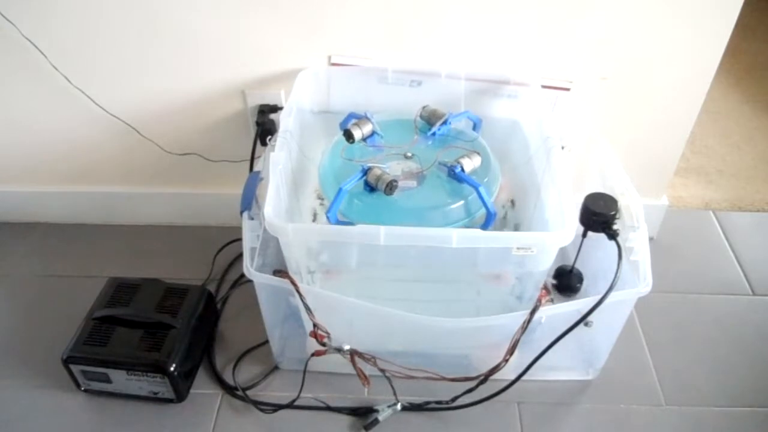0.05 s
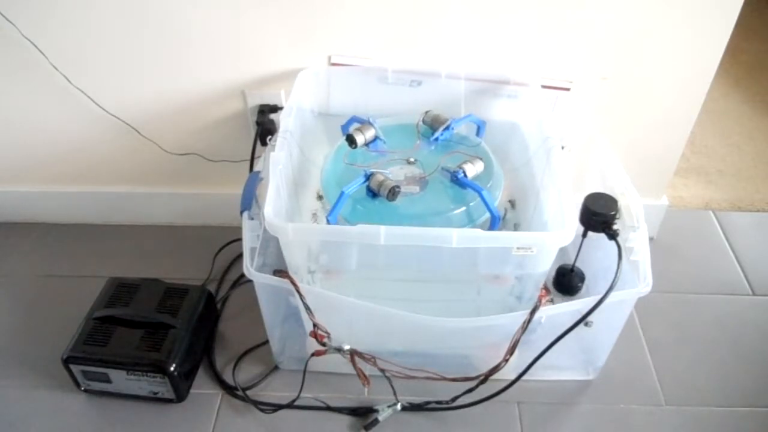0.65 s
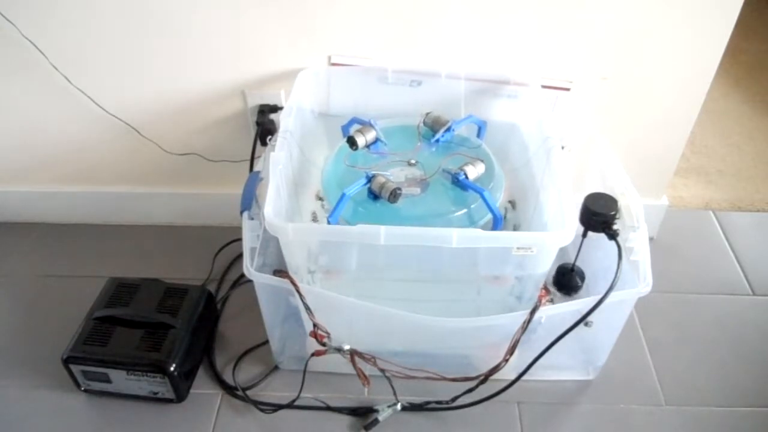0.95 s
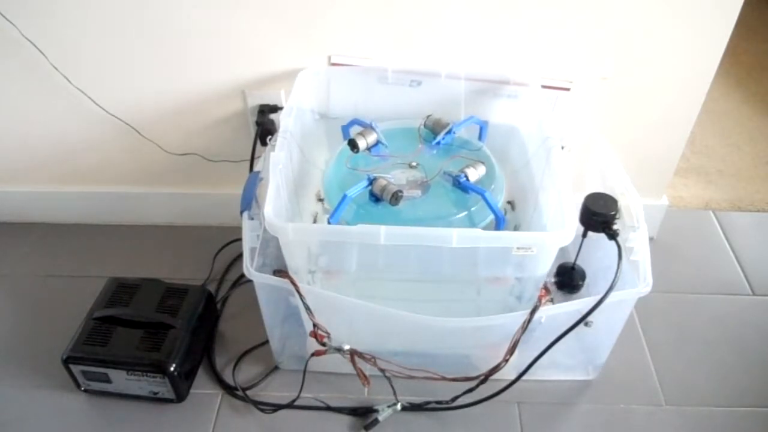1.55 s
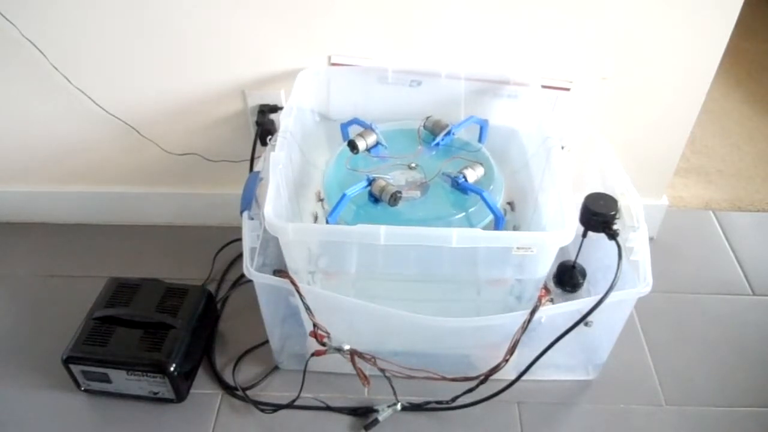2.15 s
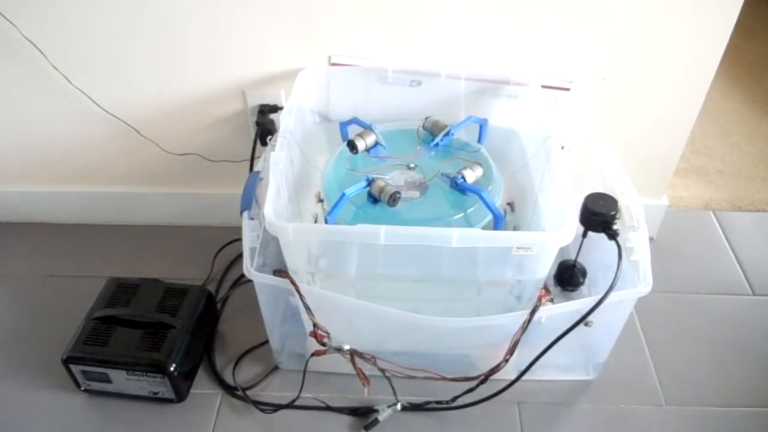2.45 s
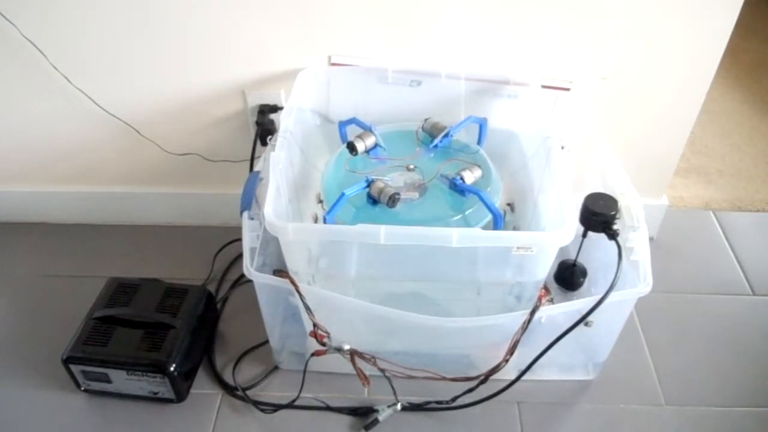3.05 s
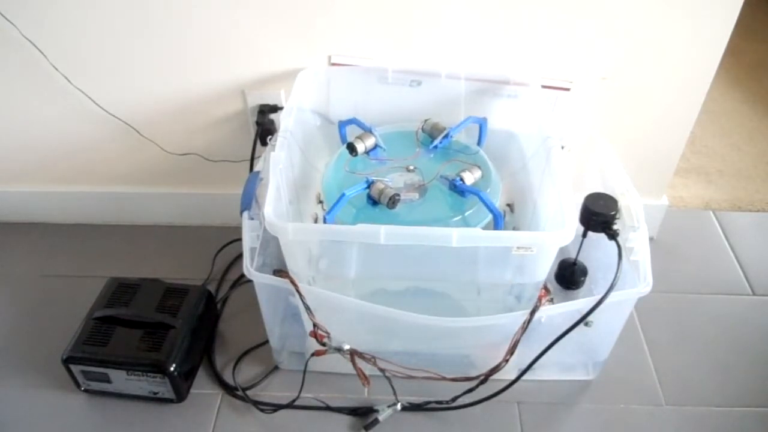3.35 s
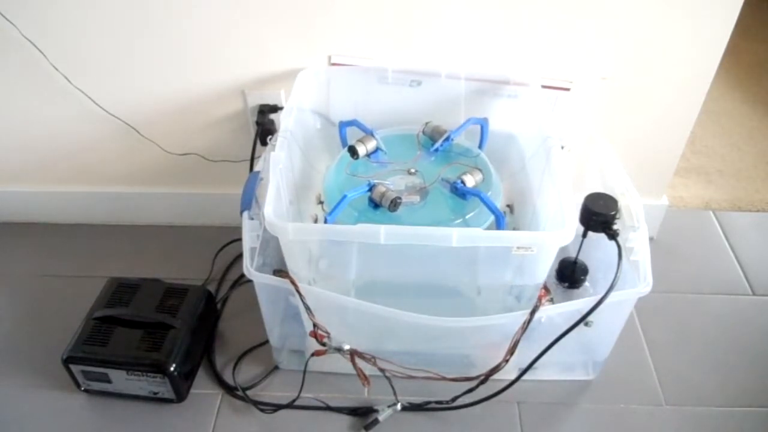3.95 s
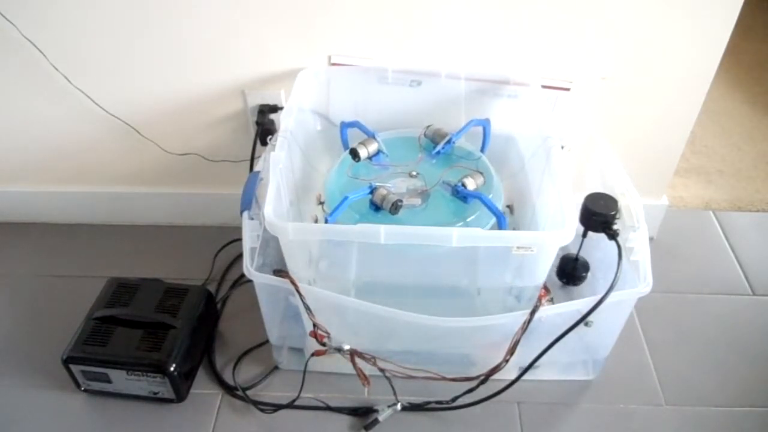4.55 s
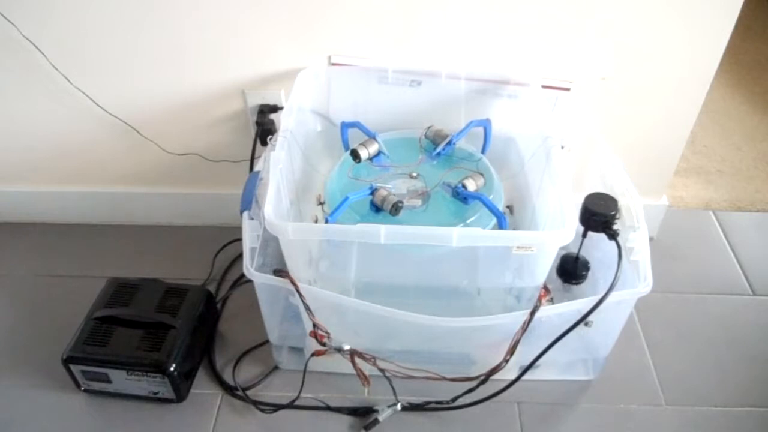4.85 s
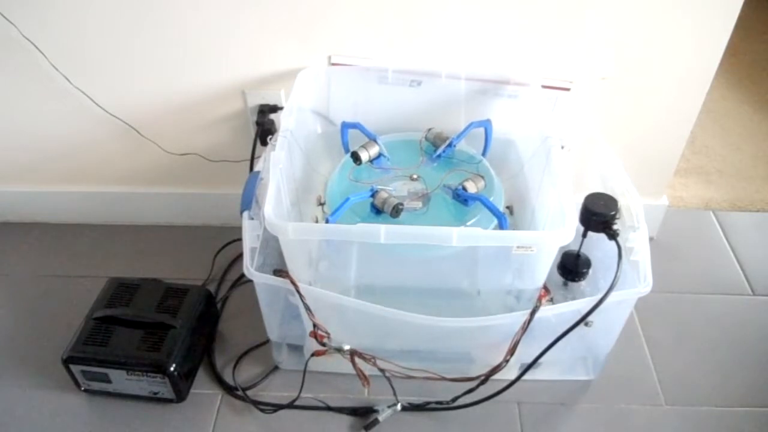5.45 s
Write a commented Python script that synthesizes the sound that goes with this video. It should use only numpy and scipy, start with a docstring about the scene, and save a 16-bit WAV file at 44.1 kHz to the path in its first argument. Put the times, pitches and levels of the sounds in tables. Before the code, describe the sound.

Small electric pumps jet water into a plastic tub on a tiled floor, heard from about a metre with short reflections from the tub and room. From the start a bright, fine spray patters on the water, with continuous gurgling and bubbling. Larger drops slap the surface throughout, among ringing plops and small splashes. A faint motor hum lies underneath, and one of its tones sags in pitch during the first second. Soft, low thuds come at about 0.7 seconds, around 3.3 seconds and near 4.9 seconds, all much quieter than the water. From about 4 seconds the spray thins and becomes less even. At around 5 seconds the water settles for a moment, then churns and plops again until the end at about 5.5 seconds. A faint, low rush of room air sits behind it all.

```python
"""Small electric pumps jet water into a plastic tub on a tiled floor, heard from about a metre.
From the start the jets patter as fine spray and drive in air that rings as bubbles, and the tub and
the room reflect the sound. In the first second one tone of the faint motor hum sags in pitch.
Larger drops slap the surface throughout, among plops, splashes and a few soft thuds.
From about four seconds the spray thins; near five the pool settles for a moment, then churns again."""
import sys
import numpy as np
from scipy import signal
from scipy.fft import rfft, irfft, next_fast_len
from scipy.io import wavfile
from scipy.ndimage import map_coordinates

SR = 44100
rng = np.random.default_rng(int(sys.argv[2]) if len(sys.argv) > 2 else 0)


def waveform_to_disk(signal):
    """Save audio, clipped to [-1, 1], as 16-bit WAV at the path in sys.argv[1]."""
    frames = np.transpose(np.atleast_2d(signal))
    scaled = np.clip(frames, -1, 1) * 32767
    samples = np.round(scaled).astype(np.int16)
    wavfile.write(sys.argv[1], SR, samples)


N = 243431

# Larger drops slapping the surface: start_s, level_db (levels in all tables are relative)
DROP_IMPACTS = [(0.0882, -22.5), (0.1496, -28.5), (0.2418, -25.5), (0.325, -23), (0.5076, -23.5),
                (0.582, -21.5), (0.7096, -24), (0.8554, -32), (1.105, -30), (1.289, -24), (1.4423, -24.5),
                (1.4623, -28), (1.569, -38), (1.8433, -22), (2.0498, -20), (2.148, -26), (2.513, -25),
                (2.9043, -24.5), (3.6254, -27), (3.7855, -28), (4.0287, -27.5), (4.1624, -25),
                (4.3094, -27), (4.433, -26), (4.4468, -22.5), (4.665, -25.5), (5.309, -29)]
# Single loud bubbles: start_s, pitch_hz, level_db
LARGE_BUBBLES = [(.151, 1774, -29.5), (.203, 2270, -28), (.372, 1750, -31), (.584, 3480, -27),
                 (.608, 2330, -24.5), (.623, 1610, -28), (.808, 995, -30), (.881, 2950, -26),
                 (.945, 1166, -26), (1.015, 1760, -28), (1.105, 1060, -31.5), (1.109, 2370, -30),
                 (1.227, 1303, -32.5), (1.382, 3700, -34), (1.427, 1127, -30), (1.546, 1146, -33.5),
                 (1.629, 1597, -25), (1.695, 3045, -25), (1.959, 1790, -32), (1.989, 2410, -27),
                 (2.02, 2380, -24.5), (2.042, 1520, -33), (2.181, 1790, -28.5), (2.238, 3470, -29.5),
                 (2.322, 2070, -33), (2.605, 2390, -30), (2.918, 1042, -35), (3.109, 2920, -33),
                 (3.127, 1740, -31.5), (3.196, 648, -25.5), (3.275, 915, -35), (3.363, 900, -31.5),
                 (3.462, 2730, -32), (3.476, 4630, -29), (3.487, 2164, -30.5), (3.791, 2400, -30),
                 (3.979, 2730, -23.5), (4.068, 1520, -33), (4.114, 3560, -29), (4.167, 4400, -26),
                 (4.467, 2230, -30.5), (4.533, 1017, -37.5), (4.697, 2207, -31), (4.708, 3850, -31),
                 (4.75, 2210, -32), (4.796, 1710, -28.5), (4.858, 2280, -32), (4.933, 1870, -33.5),
                 (5.057, 1210, -35), (5.377, 2600, -27.5), (5.482, 2610, -28)]
# Spectrum of the fine spray: frequency_hz, gain_db
SPRAY_SPECTRUM = [(200, -38), (700, -26), (1500, -8.5), (3000, -4.5), (5000, -3.5), (7500, -5),
                  (9500, -4.5), (12000, 0.5), (14300, -2)]


def amp(db):
    """Decibels express an amplitude ratio on a logarithmic scale."""
    return 10 ** (np.asarray(db) / 20)


def unit(x):
    """Normalisation to an rms of 1."""
    return x / np.sqrt(np.mean(x ** 2) + 1e-20)


def contour(points):
    """Linear interpolation of (time_s, value) points, one value a sample."""
    return np.interp(np.arange(N) / SR, *np.transpose(points))


def wobble(knots_per_s):
    """Random modulation: a smooth curve through Gaussian knots."""
    grid = np.arange(0, N + 32, 32)
    curve = map_coordinates(rng.standard_normal(4096), [grid * knots_per_s / SR], mode="wrap")
    return np.interp(np.arange(N), grid, curve)


def coloured(x, spectrum):
    """Minimum-phase filtering by (frequency_hz, gain_db) points on a log frequency axis."""
    size = 2 * next_fast_len(N // 2 + 8192)
    hz, db = np.transpose(spectrum)
    gain_db = np.interp(np.log(np.fft.rfftfreq(size, 1 / SR) + 1), np.log(hz + 1), db)
    cepstrum = irfft(np.log(amp(gain_db)))
    cepstrum[1:size // 2] *= 2  # folding the cepstrum makes the filter causal
    cepstrum[size // 2 + 1:] = 0
    return irfft(rfft(x, size) * np.exp(rfft(cepstrum)), size)[..., :N]


def add(track, start_s, sound):
    """Superposition: a sound adds to the track from its start time."""
    part = track[max(round(start_s * SR), 0):][:len(sound)]
    part += sound[:len(part)]


def aftermath(events, fade_s):
    """Incoherent summation: (start_s, level_db) events decay exponentially and add in power."""
    power, t = np.zeros(N), np.arange(SR // 3) / SR
    for start_s, db in events:
        add(power, start_s, (amp(db) * np.exp(-t / fade_s)) ** 2)
    return np.sqrt(power)


def room_air():
    """Ambient noise: the low rush of the house, partly correlated between left and right."""
    # Spectrum of the rush: frequency_hz, gain_db
    air_spectrum = [(10, -2.5), (22, 8.5), (40, -8), (60, -5.5), (80, -7), (120, -8), (250, -8.5),
                    (400, -8), (700, -14.5), (1500, -16), (6000, -59)]
    # Side signal against mid: frequency_hz, gain_db
    air_width = [(25, -25), (60, -3.5), (250, -4.5), (1000, -3.5)]
    mid, side = coloured(rng.standard_normal((2, N)), air_spectrum)
    side = coloured(side, air_width)
    return unit(np.array([mid + side, mid - side]))


def echoes(t60_s, count):
    """Impulse response of unit energy: sparse reflections that decay by 60 dB in t60_s."""
    delay_s = rng.uniform(.001, t60_s, count)
    strength = rng.standard_normal(count) * amp(-60 * delay_s / t60_s)
    train = np.bincount((delay_s * SR).astype(int), strength)
    return train / np.linalg.norm(train)


def reflected(x, t60_s, count):
    """Time-varying convolution: the jets wander, so each moment meets its own reflections."""
    track, hop = np.zeros(N), SR // 25
    padded = np.pad(x, (0, 2 * hop))
    window = signal.windows.hann(2 * hop, sym=False) ** .5
    for start in range(0, N, hop):
        frame = padded[start:start + 2 * hop] * window
        add(track, start / SR, signal.fftconvolve(frame, echoes(t60_s, count)))
    return track


def tub_and_room(x, tub_db, tub_t60_s, room_db, room_t60_s):
    """Early reflection from plastic walls and reverberation from tiles; the treble spreads widest."""
    # Side signal against mid: frequency_hz, gain_db
    stereo_width = [(300, -21), (1000, -12), (2400, -46), (4000, -29), (6500, -6), (9500, -5), (13000, -3)]
    mid = x + amp(tub_db) * reflected(x, tub_t60_s, count=60)
    mid += amp(room_db) * reflected(x, room_t60_s, count=400)
    side = reflected(x, t60_s=.005, count=40) + amp(room_db) * reflected(x, room_t60_s, count=400)
    side = coloured(side, stereo_width)
    return np.array([mid + side, mid - side]) * amp([[-.3], [.3]])


def motors(waver, flutter_db):
    """Rotation tones: the pumps' hum wavers with the load, and one pump sags in speed and fades."""
    # Steadier tones, fading either side of their loudest moment: pitch_hz, loudest_s, level_db, db_per_s
    motor_tones = [(213.7, 0, -60.5, 10.5), (252, -0.5, -58, 30), (333.5, 3.5, -68, 3.5),
                   (416, 0.5, -63.5, 7.5)]
    from_hz, to_hz, sag_s = 297, 233.4, .47
    track, t = np.zeros(N), np.arange(N) / SR
    sag_hz = to_hz + (from_hz - to_hz) * np.exp(-(t / sag_s) ** 2)
    tones = [(sag_hz, -65 - 6 * t)]  # fades by 6 dB a second
    tones += [(hz, db - fade * np.abs(t - loudest_s)) for hz, loudest_s, db, fade in motor_tones]
    for hz, db in tones:
        phase = 2 * np.pi * np.cumsum(hz * (1 + waver * wobble(30))) / SR
        track += np.sqrt(2) * np.sin(phase) * amp(db + flutter_db * wobble(16))
    return track


def thuds(rise_s, fade_s):
    """Damped oscillation: dull low tones swell and fade under the water noise."""
    # Soft low thuds: start_s, pitch_hz, level_db
    low_thuds = [(0.719, 72.3, -50.5), (.75, 35.14, -42), (3.17, 83.5, -51.5), (3.33, 167, -51.5),
                 (3.35, 222.5, -53), (4.9, 37, -45)]
    track, t = np.zeros(N), np.arange(SR // 2) / SR
    envelope = (1 - np.exp(-t / rise_s)) * np.exp(-t / fade_s)
    for start_s, hz, db in low_thuds:
        add(track, start_s, amp(db) * np.sin(2 * np.pi * hz * t) * envelope)
    return track


def bubble(hz, t, cycles, rise):
    """Bubble resonance: a pocket of air rings down, its pitch climbing as it nears the surface."""
    age = hz * t / cycles
    phase = 2 * np.pi * hz * t * (1 + rise * np.tanh(age / 2))
    return np.sin(phase) * np.exp(-age) * (1 - np.exp(-hz * t))


def swarm(hz, start_s, cycles, size_db, scatter_s, count):
    """Fragmentation: each pocket of air breaks into count bubbles, close in pitch and time."""
    delay, life = rng.exponential(size=(2, len(hz), count, 1))  # axes: pocket, bubble, sample
    pitch_hz = np.minimum(hz[:, None, None] * np.exp(0.0877 * rng.standard_normal(delay.shape)), SR / 2)
    strength = amp(size_db * np.minimum(rng.exponential(size=(len(hz), 1, 1)), 2))
    samples = np.arange(int(SR * 36 / np.median(hz)))  # 36 periods of the median pitch
    rings = strength * bubble(pitch_hz, samples / SR, cycles * (.5 + np.minimum(life, 2) / 2), rise=0.049)
    onsets = ((start_s[:, None, None] + scatter_s * delay) * SR).astype(int)
    return unit(np.bincount((onsets + samples).ravel(), rings.ravel(), N)[:N])


def plunge(low_hz, high_hz, count):
    """Air entrainment: deep, quickly damped bubbles merge into a rush where the jets enter the pool."""
    # Strength of the rush: time_s, level_db
    rush_db = [(0, -53), (.7, -64.5), (1.3, -57), (1.8, -71), (2.3, -55.5), (2.8, -59.5), (3.3, -61.5),
               (4, -62.5), (4.4, -74), (5.5, -76)]
    when, pitch = rng.random((count, 2)).T
    hz = low_hz * (high_hz / low_hz) ** np.sqrt(pitch)
    rush = swarm(hz, when * N / SR, cycles=9.0, size_db=3, scatter_s=.02, count=2)
    return rush * amp(contour(rush_db))


def bubbling_level(shed_db, clear_s):
    """Power addition, in dB: the pool churns, and each large bubble sheds small ones."""
    # Air driven under water, dying down whenever the pool settles: time_s, level_db
    churn_db = [(0, -46.5), (2.1, -43), (2.62, -42.5), (2.8, -47.5), (2.95, -43), (3.38, -43.5),
                (3.52, -46), (4.0, -44), (4.42, -46.5), (4.84, -43), (5.03, -59), (5.08, -44.5),
                (5.52, -44.5)]
    shed = amp(shed_db) * aftermath([(start_s, db) for start_s, _, db in LARGE_BUBBLES], clear_s)
    return 20 * np.log10(np.hypot(amp(contour(churn_db)), shed))


def gurgle(level_db, spread, count):
    """Resonance of small bubble clusters under the jets, lower where the water churns deeper."""
    # Depth of the churning, as the typical bubble pitch: time_s, pitch_hz
    typical_pitch = [(0, 2200), (1.3, 1918), (2.3, 1820), (2.9, 2073), (3.3, 1744), (4, 1816), (4.5, 2505),
                     (5.5, 2986)]
    # Tone colour of the bubbling: frequency_hz, gain_db
    gurgle_spectrum = [(350, -7.5), (700, -6.5), (1100, -5.5), (1800, 0), (2600, 3.5), (3600, 4.5),
                       (5500, -3.5), (9000, -22)]
    when, pitch = rng.random((count, 2)).T
    start_s = when * N / SR
    octaves = spread * np.arcsin(2 * pitch - 1)
    hz = np.interp(start_s, *np.transpose(typical_pitch)) * 2 ** octaves
    clusters = swarm(hz, start_s, cycles=9.2, size_db=0.5, scatter_s=.012, count=3)
    return unit(coloured(clusters, gurgle_spectrum)) * amp(level_db)


def splashes(grain_db):
    """Cavity collapse: a crater closes and its bubbles ring at once, blurred into a band of noise; the highest
    bands are the hiss of drops slapping the water."""
    # Bands of noise: below 7 kHz crowds of like-sized bubbles, above it the hiss of slapping drops: start_s,
    # pitch_hz, level_db, decay_s
    bubble_crowds = [(.114, 1500, -37.5, 0.018), (.426, 5200, -44.5, 0.18), (.608, 2140, -36.5, 0.04),
                     (.856, 7400, -34.5, 0.018), (0.939, 3420, -38, .018), (1.106, 7000, -42, 0.0069),
                     (1.199, 5850, -37.5, .016), (1.288, 5030, -45, .014), (1.381, 4200, -43.5, .031),
                     (1.462, 8900, -32.5, .012), (1.568, 9100, -30.5, 0.0084), (1.626, 1790, -43, 0.042),
                     (1.769, 1920, -42, 0.035), (2.147, 1400, -35, 0.026), (2.21, 880, -49, 0.092),
                     (2.238, 3700, -41.5, 0.013), (2.512, 4160, -40, 0.02), (2.599, 4270, -41.5, 0.046),
                     (2.93, 2110, -44, 0.1), (3.24, 1010, -48.5, .13), (3.468, 4740, -41.5, .027),
                     (3.605, 8900, -38, .025), (3.69, 537, -46.5, 0.09), (3.788, 2920, -37, 0.01),
                     (3.9, 1740, -41, 0.028), (3.94, 800, -46.5, 0.26), (4.016, 5050, -44, 0.059),
                     (4.164, 4500, -39.5, .013), (4.308, 7500, -38.5, 0.02), (4.49, 3020, -46.5, 0.057),
                     (4.626, 4000, -43.5, .033), (5.078, 5700, -42, .014), (5.101, 1130, -51, 0.21),
                     (5.185, 3270, -44.5, 0.039), (5.335, 3140, -44, .11)]
    # Band around a crowd's pitch: offset_octaves, gain_db
    band_shape = [(-0.92, -19), (-0.23, -9), (-0.11, -2), (0.17, -2), (0.095, -7), (0.62, -18)]
    track, t = np.zeros(N), np.arange(8192) / SR
    hz = np.fft.rfftfreq(len(t), 1 / SR) + 1
    for start_s, pitch_hz, db, decay_s in bubble_crowds:
        births = rng.standard_normal(len(t)) * amp(grain_db * rng.standard_normal(len(t)))
        band = amp(np.interp(np.log2(hz / pitch_hz), *np.transpose(band_shape)))
        crowd = unit(irfft(rfft(births) * band))
        add(track, start_s, amp(db) * crowd * np.exp(-t / decay_s))
    return track


def plops(cycles, rise, life_s, tub_db, tub_t60_s):
    """Free oscillation: large bubbles ring until they burst, each with its own echoes in the tub."""
    track, t = np.zeros(N), np.arange(SR // 12) / SR
    for start_s, hz, db in LARGE_BUBBLES:
        ring = amp(db) * bubble(hz, t, cycles, rise) * np.exp(-(t / life_s) ** 6)
        walls = signal.fftconvolve(ring, echoes(tub_t60_s, count=60))
        walls *= np.linalg.norm(ring) / np.linalg.norm(walls)
        add(track, start_s, ring)
        add(track, start_s + .004, amp(tub_db) * walls)
    return track


def splats(burst_s, scatter_s, scatter_db):
    """Impact noise: a drop slaps the water in a brief burst and throws smaller droplets after it."""
    # Spectrum of a slap: frequency_hz, gain_db
    slap_spectrum = [(300, -22), (1500, -23), (4000, -13), (8000, -11), (11500, 3.5), (14300, 0)]
    track, t = np.zeros(N), np.arange(SR // 10) / SR
    for start_s, db in DROP_IMPACTS:
        burst = rng.choice([-1, 1], len(t)) * np.exp(-(t / burst_s) ** 2)
        droplets = unit(rng.standard_normal(len(t)) ** 3) * np.exp(-t / scatter_s)
        add(track, start_s, amp(db) * (burst + amp(scatter_db) * droplets))
    return coloured(track, slap_spectrum)


def spray_level(surge_db, surges_per_s, throw_db, fall_s):
    """Power addition, in dB: the jets surge at random, and each splat throws up extra spray."""
    # Strength of the jets: time_s, level_db
    flow_db = [(0, -36.5), (.07, -41.5), (1.6, -41), (1.66, -42.5), (1.72, -41.5), (2.55, -41.5),
               (2.95, -42), (3.35, -41), (3.85, -42.5), (3.97, -46.5), (4.12, -45), (4.2, -42), (4.5, -42),
               (4.88, -42.5), (5.02, -47.5), (5.12, -43), (5.29, -46.5), (5.52, -45.5)]
    jets = amp(contour(flow_db) + surge_db * wobble(surges_per_s))
    thrown = amp(throw_db) * aftermath(DROP_IMPACTS, fall_s)
    return 20 * np.log10(np.hypot(jets, thrown))


def spatter(level_db, low_hz, high_hz, count):
    """Resonance of tiny bubbles: droplets land with pitched spits, most of them very high."""
    when, pitch = rng.random((count, 2)).T
    hz = low_hz + (high_hz - low_hz) * np.sqrt(pitch)
    spits = swarm(hz, when * N / SR, cycles=8.4, size_db=3.5, scatter_s=0.0045, count=4)
    return unit(coloured(spits, SPRAY_SPECTRUM)) * amp(level_db)


def splinters(x, depth_db):
    """Spectral modulation: each splinter of the jet favours its own band for hundredths of a second."""
    spectra = signal.stft(x, nperseg=128)[2]
    knots = rng.standard_normal((12, spectra.shape[1] // 12 + 2))
    field = map_coordinates(knots, np.indices(spectra.shape) / [[[7]], [[12]]])  # 7 bins by 12 frames
    return signal.istft(spectra * amp(depth_db * field), nperseg=128)[1][:N]


def spray(level_db, ticks_per_s, size_db, clump_db, patchy_db, mist):
    """Shot noise: thousands of droplet ticks arrive in clumps as the jets break up, over a fine mist."""
    hits = rng.random(N) < ticks_per_s / SR
    ticks = hits * rng.choice([-1, 1], N) * amp(size_db * np.minimum(rng.exponential(size=N), 4))
    patter = unit(ticks) * amp(clump_db * wobble(200)) + mist * rng.standard_normal(N)
    return unit(coloured(splinters(patter, patchy_db), SPRAY_SPECTRUM)) * amp(level_db)


def scene():
    """Superposition of the water and its reflections with the motors, thuds and room air."""
    spray_db = spray_level(surge_db=0.97, surges_per_s=20, throw_db=-19, fall_s=0.035)
    bubbling_db = bubbling_level(shed_db=-21.5, clear_s=0.025)
    water = amp(-0.52) * spray(spray_db, ticks_per_s=2500, size_db=2.0, clump_db=2.5,
                               patchy_db=1.5, mist=0.74)
    water += amp(-4.5) * spatter(spray_db, low_hz=4170, high_hz=13960, count=1200)
    water += amp(-6) * gurgle(bubbling_db, spread=0.96, count=1000)
    water += amp(-1) * plunge(low_hz=424, high_hz=1220, count=500)
    water += amp(-2.5) * splats(burst_s=0.0048, scatter_s=0.0084, scatter_db=-20)
    water += amp(-0.5) * splashes(grain_db=5)
    water += amp(-2.0) * plops(cycles=7.65, rise=0.022, life_s=0.049, tub_db=-5.5, tub_t60_s=.14)
    low = amp(1.0) * motors(waver=0.0163, flutter_db=4.0) + thuds(rise_s=.015, fade_s=0.072)
    water_in_room = tub_and_room(water, tub_db=-9.5, tub_t60_s=.04, room_db=-6, room_t60_s=.26)
    return water_in_room + low + amp(-52.5) * room_air()


def record(dry):
    """Band limiting: an ideal low-pass filter removes the highest treble."""
    cutoff_hz = 14350
    size = next_fast_len(N + 8192)
    passband = np.fft.rfftfreq(size, 1 / SR) < cutoff_hz
    return irfft(rfft(dry, size) * passband, size)[..., :N]


dry = scene()
out = record(dry)
waveform_to_disk(out)
```